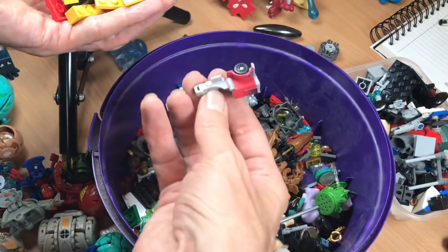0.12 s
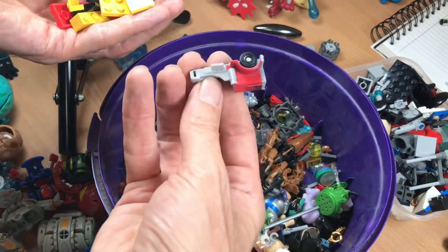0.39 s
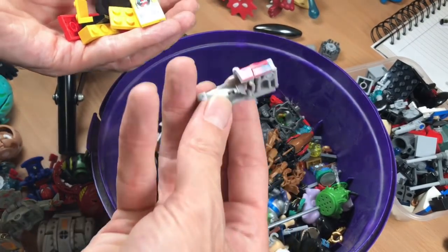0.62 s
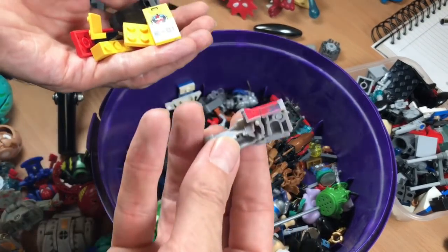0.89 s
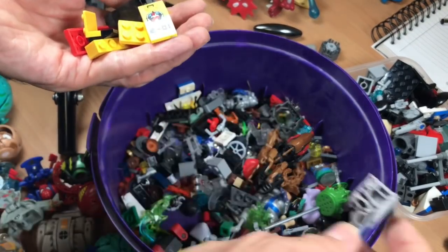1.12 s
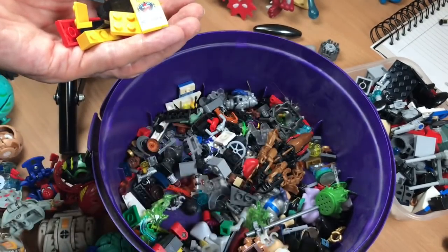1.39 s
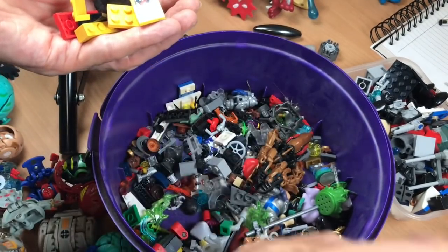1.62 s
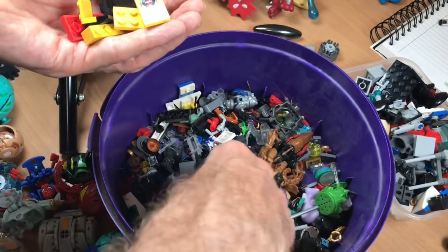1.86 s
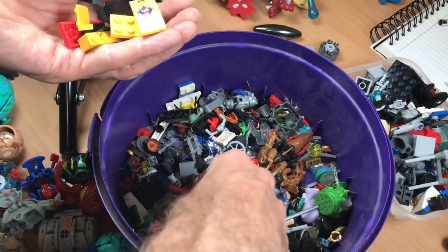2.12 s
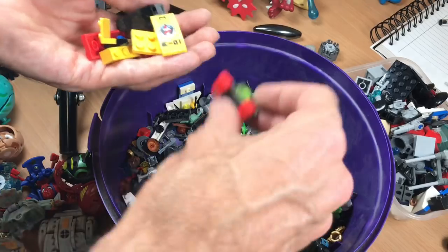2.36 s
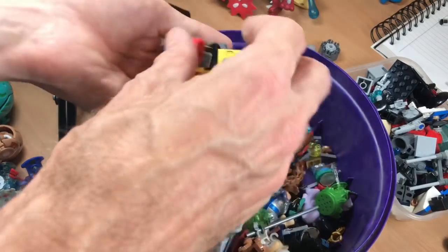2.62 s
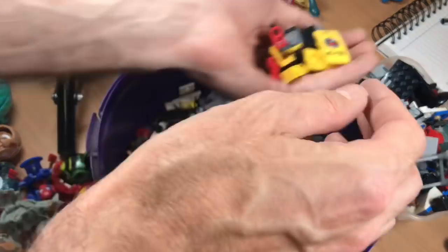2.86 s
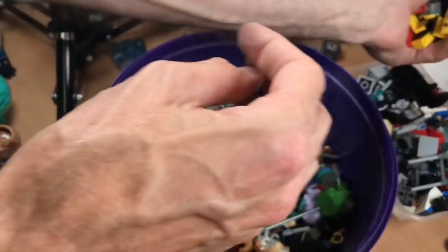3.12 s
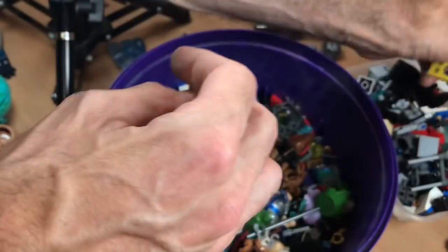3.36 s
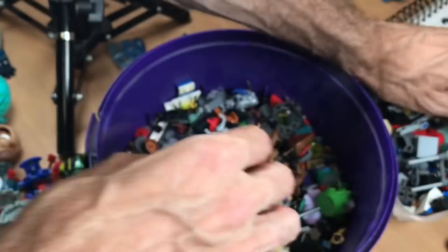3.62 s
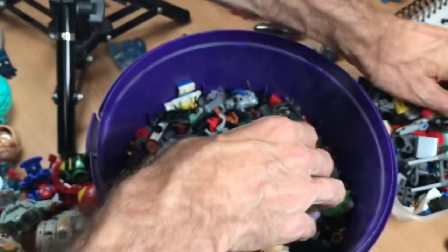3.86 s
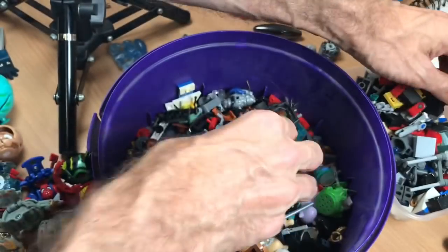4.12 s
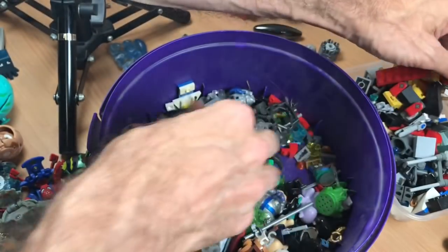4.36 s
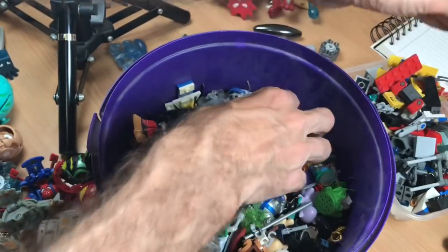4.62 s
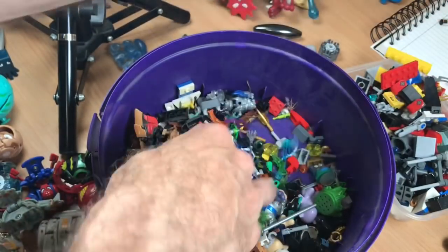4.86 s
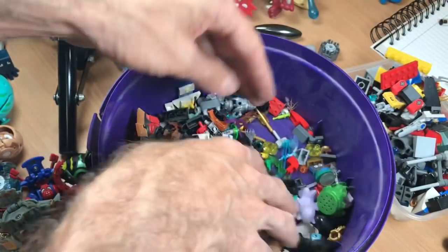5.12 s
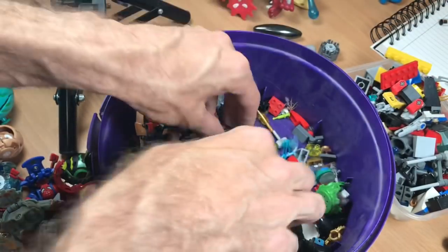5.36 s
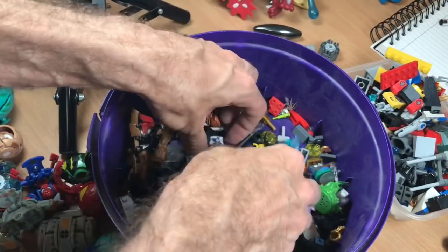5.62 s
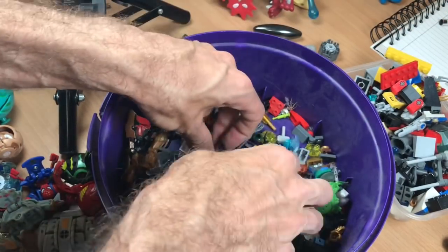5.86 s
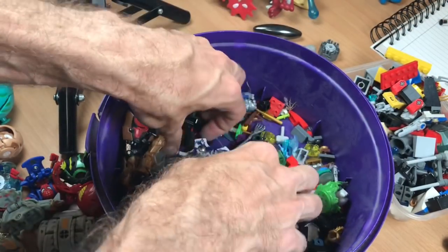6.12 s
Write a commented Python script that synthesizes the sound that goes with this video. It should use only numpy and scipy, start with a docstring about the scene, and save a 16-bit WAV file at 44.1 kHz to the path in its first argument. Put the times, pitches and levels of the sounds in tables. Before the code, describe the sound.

Near silence at first, with only soft skin rubs over hiss and hum. Light plastic pieces clack down, followed by sparse ticks and one sharp bright snap. Then rummaging begins: small toy bricks rattle and tumble densely in a plastic tub, loudest midway, while the tub and table boom softly. Close microphone, small room, short reverberation.

```python
"""In a quiet room, hands drop, pick up and stir small hollow plastic pieces in a plastic tub on a table.
Each collision, close to the microphone, is a sharp blow and a short chatter that ring the pieces' modes.
Many small collisions make the moving pile; pushes boom in the tub and table, and stirring shakes them.
Fingers rub softly as shaped noise. Behind it all are microphone hiss and a faint, wavering mains hum."""
import sys
import numpy as np
from scipy import signal
from scipy.fft import rfft, irfft, next_fast_len
from scipy.io import wavfile
from scipy.ndimage import uniform_filter1d, map_coordinates

SR = 44100
rng = np.random.default_rng(int(sys.argv[2]) if len(sys.argv) > 2 else 0)


def natural_amplitude(level_db):
    """Convert a level in decibels to a linear amplitude factor, elementwise."""
    exponent = np.asarray(level_db, float) / 20
    return 10 ** exponent


def int16_out(signal):
    """Quantize to a 16-bit WAV file."""
    q = np.round(np.clip(np.atleast_2d(signal).T, -1, 1) * 32767)
    wavfile.write(sys.argv[1], SR, q.astype(np.int16))


N = 275184  # length in samples

# collisions that stand out: (time [s], peak level [dB], strongest mode [Hz],
# low body against the peak [dB], chatter against the peak [dB])
COLLISIONS = [(1.046, -59, 5960, -25, -15), (1.4801, -22, 1850, -8.5, -14), (1.4864, -24, 11800, 0, -19),
              (1.5008, -27.5, 1460, -6, -10), (1.5372, -35.5, 1835, -10, -8.5),
              (1.5618, -24, 9800, -15.5, -12.5), (1.5945, -32, 5600, -9.5, -12),
              (1.8942, -45.5, 1660, 10, -9.5), (1.93, -31.5, 4700, -8, -12),
              (1.9614, -27.5, 2320, -15.5, -13), (1.99, -41, 2300, 1, -14), (2.0174, -55, 2170, -6, -10),
              (2.0518, -42.5, 7450, -15, -13.5), (2.0734, -37, 4600, -15, -14.5),
              (2.1646, -53.5, 1420, -34, -15), (2.3245, -32, 7000, -36, -19),
              (2.3446, -51, 7290, -34, -11.5), (2.451, -63, 5060, -16.5, -7.5),
              (2.5007, -48, 1730, 2.5, -14.5), (2.5227, -61, 1880, -13, -9),
              (2.5383, -27.5, 6100, -28.5, -14), (2.5432, -11, 7820, -38, -14),
              (2.5525, -34, 7700, -24.5, -8), (2.5904, -41.5, 7560, -42, -16),
              (2.608, -30, 7750, -34, -7.5), (2.6136, -20, 7500, -43, -17),
              (2.6404, -31.5, 8770, -29.5, -6), (2.6553, -30, 12500, -27, -16),
              (2.6883, -42.5, 6950, -14, -11), (2.821, -61, 1220, 1, -7.5), (2.8674, -56.5, 5020, -14, -13),
              (3.018, -51.5, 3320, -8.5, -13.5), (3.24, -56.5, 5800, -12.5, -10.5),
              (3.2924, -42, 5100, -24, -15.5), (3.2992, -45, 4800, -21, -8.5),
              (3.3687, -45, 5670, -14, -13.5), (3.4016, -55, 1970, 3, -12),
              (3.4373, -32.5, 2190, -39, -8.5), (3.4459, -18, 8690, -24, -15.5),
              (3.4917, -24.5, 6280, -22, -14), (3.5627, -34, 10700, -24, -15),
              (3.5772, -21, 7770, -23, -17.5), (3.6402, -31, 1660, 3, -16.5),
              (3.6594, -36, 5380, -30, -10.5), (3.6728, -35, 7960, -19, -15),
              (3.7211, -27, 6660, -14, -8.5), (3.7495, -23.5, 5240, -14.5, -14.5),
              (3.7938, -31.5, 6140, -23, -19), (3.8223, -27, 9330, -12, -13), (3.8432, -23, 8300, -13, -14),
              (3.8935, -26, 2120, -9, -13.5), (3.9044, -26.5, 1740, -13, -11),
              (3.976, -22.5, 2360, -8, -15), (4.0014, -24, 7930, -15, -17.5),
              (4.0504, -34.5, 7520, -15, -11), (4.106, -37.5, 1730, -3, -9.5),
              (4.132, -27.5, 8370, -14.5, -16), (4.148, -30.5, 7260, -31, -13.5),
              (4.172, -27.5, 6970, -10.5, -19.5), (4.2034, -48, 2120, -5, -13),
              (4.3074, -21, 1380, -11.5, -9), (4.3155, -15, 3820, -11, -15), (4.3309, -14, 3070, -9.5, -16),
              (4.3381, -12, 1620, -14, -14.5), (4.3734, -21, 1660, -14, -18),
              (4.3971, -22, 1640, -10.5, -8.5), (4.4507, -19.5, 7400, -26.5, -10.5),
              (4.4659, -18, 6260, -28, -13.5), (4.4826, -12, 6740, -4, -19.5),
              (4.491, -7.5, 2460, -17, -16.5), (4.5285, -12, 3700, -8, -20.5),
              (4.5367, -11.5, 3830, -10, -17.5), (4.5535, -12.5, 1506, -16.5, -15),
              (4.602, -23, 4600, -23.5, -11.5), (4.6306, -28.5, 1690, -15, -16),
              (4.6664, -17.5, 9520, -21, -14), (4.7054, -22, 6580, -25, -9.5),
              (4.7303, -20, 7500, -16, -11), (4.7678, -14, 9920, -20, -15),
              (4.8068, -17.5, 6700, -18.5, -15), (4.8334, -11.5, 9100, -37, -16),
              (4.8444, -16, 9050, -7.5, -20), (4.9326, -34, 6800, -9, -12.5), (5.02, -48, 2550, -6, -19),
              (5.0549, -40, 1540, -9, -2.5), (5.0674, -20, 7240, -6, -11.5),
              (5.0738, -21, 3770, -10.5, -12), (5.1102, -32.5, 1440, -4.5, -13.5),
              (5.1342, -24.5, 6740, -22, -14.5), (5.1462, -22, 1570, -15, -12.5),
              (5.1803, -21.5, 6910, 7, -13.5), (5.2146, -24.5, 7500, -20, -16),
              (5.2605, -31.5, 8200, -21, -14.5), (5.284, -29.5, 1610, 1, -8.5),
              (5.3729, -32.5, 1670, 1, -11), (5.4169, -25.5, 1600, -12, -9),
              (5.4366, -24.5, 2300, -6, -8.5), (5.5064, -34, 7550, -19, -14.5),
              (5.5319, -24.5, 3640, -14.5, -11.5), (5.5576, -24, 3120, -23, -15),
              (5.6027, -23.5, 4020, -31, -14), (5.6659, -25, 11100, -20, -10.5),
              (5.7108, -28, 8700, -17, -12), (5.7548, -19.5, 7000, -14, -14.5),
              (5.8022, -29.5, 1220, -5, -10.5), (5.816, -36, 4060, -14, -7.5),
              (5.8493, -35.5, 1570, 4, -15), (5.891, -43, 7400, -14, -1), (5.9184, -32, 4700, -15, -10),
              (5.9404, -22, 7200, -9, -11.5), (5.9644, -18, 2130, -13, -16.5),
              (6.0282, -17, 3830, -10, -15), (6.0565, -19.5, 4240, -11, -9.5),
              (6.0751, -22, 2460, -13.5, -14), (6.1614, -18, 7230, -6.5, -12.5),
              (6.193, -23, 6500, -8, -12.5)]


def clacks():
    """The collisions that stand out, each with its own strongest mode, body and chatter."""
    s, db, main_hz, body_db, chatter_db = np.transpose(COLLISIONS)
    usual_body_db = -11.5  # low body of a piece of middling size
    return collide(s, db, main_hz, body_db - usual_body_db, treble_share(main_hz), chatter_db,
                   size=4096, count=30, q=5.4, scatter_db=4.0,
                   main_db=5.5, width_hz=200, t60=0.056, spiky_db=3)


def treble_share(main_hz):
    """Treble of a piece in dB: smaller pieces ring higher and carry more of it."""
    at_5_khz_db, per_octave_db = 3, 11
    return at_5_khz_db + per_octave_db * np.log2(main_hz / 5000)


# how strongly the plastic pieces ring at each pitch: (frequency [Hz], level [dB])
PIECE_COLOUR = [(180, -37), (300, -18.5), (478, -12), (574, -10.5), (915, -5.5), (1610, 1.5), (5700, -0.5),
                (7440, 3), (12500, -17.5), (16000, -72)]


def collide(s, db, main_hz, body_db, top_db, chatter_db,
            size, count, q, scatter_db, main_db, width_hz, t60, spiky_db):
    """A sharp blow and a dying chatter of contacts ring one strong mode and `count` random ones."""
    t, hz = np.arange(size) / SR, np.fft.rfftfreq(size, 1 / SR)

    def resonance(centre, width, gain):
        """One ringing mode; a wider one dies faster."""
        return gain * 1j * hz * width / (centre * centre - hz * hz + 1j * hz * width)

    # modes crowd towards the treble
    spread = (np.arange(count) + rng.random((len(s), count))) / count
    modes = 400 * (16000 / 400) ** (spread ** 0.772)
    colour = along(PIECE_COLOUR, modes) + rng.normal(0, scatter_db, modes.shape)
    colour += body_db[:, None] / (1 + (modes / 4300) ** 5)
    colour += top_db[:, None] / (1 + (9500 / modes) ** 8)
    shape = 0
    for k in range(count):
        mode = modes[:, [k]]
        shape = shape + (-1) ** k * resonance(mode, mode / q, natural_amplitude(colour[:, [k]]))
    # small bright pieces ring the clearest
    strong_db = main_db + colour.max(1) - 6 / (1 + (main_hz / 3500) ** 4)
    shape = shape + resonance(main_hz[:, None], width_hz, natural_amplitude(strong_db)[:, None])

    # the blow is a burst of noise that dies within 2 ms
    touch = rng.standard_normal((len(s), size)) * natural_amplitude(-60 * t / 0.002)
    blow = irfft(rfft(touch) * shape, size)
    blow /= np.abs(blow).max(1)[:, None]

    # the chatter swells quickly, then dies; its strength jumps every 32 samples
    fade = natural_amplitude(-60 * t / t60) * (1 - np.exp(-t / 0.0013)) * (t < size / SR * 0.8)
    uneven = natural_amplitude(spiky_db * rng.standard_normal((len(s), size // 32)).repeat(32, 1))
    contacts = rng.standard_normal((len(s), size)) * uneven * fade
    chatter = irfft(rfft(contacts) * shape, size)
    chatter /= chatter[:, :400].std(1)[:, None]

    sound = natural_amplitude(db)[:, None] * (blow + natural_amplitude(chatter_db)[:, None] * chatter)
    at = np.round(s * SR).astype(int)[:, None] + np.arange(size)
    return np.bincount(at.ravel(), sound.ravel(), N + size)[:N]


def pile():
    """Hundreds of small random collisions a second while the pile shifts."""
    per_second = 480
    s = np.sort(rng.random(int(per_second * N / SR))) * (N - 1) / SR
    db, body_db = motion(s)
    moving = db > -100
    s, db, body_db = s[moving], db[moving], body_db[moving]
    pitch, loudness, roughness = rng.standard_normal((3, len(s)))
    main_hz = np.clip(4500 * np.exp(0.503 * pitch), 900, 13000)
    top_db = np.full(len(s), -1.5)
    return collide(s, db + 2.5 + 2.2 * loudness, main_hz, body_db, top_db, -15.5 + 3 * roughness,
                   size=1024, count=12, q=2.77, scatter_db=2.0,
                   main_db=-9.5, width_hz=700, t60=0.073, spiky_db=-0.5)


# strokes of the stirring hand, one list each: (time [s], level [dB])
STIRRING = [
    [(3.4, -79), (3.46, -39.5), (3.61, -49), (3.7, -49), (3.76, -41.5), (3.84, -45), (3.92, -37),
     (4.01, -43), (4.08, -55), (4.16, -53.5), (4.29, -80)],
    [(4.306, -40), (4.36, -38), (4.44, -46.5), (4.455, -39), (4.55, -28), (4.64, -35), (4.7, -35),
     (4.77, -35), (4.85, -39), (4.908, -47.5), (5.04, -83)],
    [(5.054, -37), (5.14, -34.5), (5.25, -43), (5.29, -39.5), (5.38, -42.5), (5.44, -35), (5.5, -42),
     (5.6, -37.5), (5.75, -36), (5.79, -42.5), (5.82, -41.5), (5.87, -49.5)],
    [(5.87, -49), (5.95, -32.5), (6.01, -31), (6.07, -35), (6.14, -40), (6.17, -36), (6.24, -46.5)],
]
# a piece or a hand lands on the pile, which then settles:
# (time [s], level [dB], settling [dB per s], low body [dB])
LANDINGS = [(1.48, -46, 130, 14), (1.925, -46, 120, 6.5), (2.54, -40, 150, -26)]


def motion(s):
    """Level and low body (dB) of the moving pile at times s: stirred, or settling after a landing."""
    silent_db = -140
    times, levels = np.concatenate(STIRRING).T
    stirred = np.any([(s >= stroke[0][0]) & (s <= stroke[-1][0]) for stroke in STIRRING], axis=0)
    db = np.where(stirred, np.interp(s, times, levels), silent_db)
    body_db = np.full(len(s), 3.5)
    for start, level_db, settle_db, low_db in LANDINGS:
        settling = np.where(s >= start, level_db - settle_db * (s - start), silent_db)
        body_db = np.where(settling > db, low_db, body_db)
        db = np.maximum(db, settling)
    return db, body_db


# pushes on the tub: (time [s], level [dB], lean towards the highest mode [dB], knock against the push [dB])
PUSHES = [(1.495, -41.5, -5.5, 3.5), (1.919, -31.5, -5.5, -13.5), (2.498, -62.5, -3, 13.5),
          (2.813, -50, -4, -9), (3.46, -50, -8, -4), (3.535, -45, -5.5, 5), (3.638, -58, 4, 15.5),
          (3.88, -43.5, -3.5, 1.5), (3.942, -50.5, 4, -20), (4.307, -33.5, 3.5, 5), (4.49, -47.5, 11, 8),
          (4.544, -38, -4, 3), (4.653, -46.5, 5.5, -25), (4.691, -52, 8, -20), (5.065, -33.5, -6.5, -4),
          (5.281, -42, 0.5, 2.5), (5.436, -32, -2, -9), (5.635, -42, 3, -7), (5.962, -49.5, 8, 8),
          (6.055, -45, 5.5, -4), (6.19, -48.5, 6, 12.5)]
# low modes of the tub on its table: (frequency [Hz], level [dB], time to fall 60 dB [s])
TUB_MODES = [(56.8, -8.5, 0.29), (93.3, -3.5, 0.45), (143.1, -1.5, 0.28)]
# colour of the knock on the tub wall: (frequency [Hz], level [dB])
KNOCK_COLOUR = [(150, -24), (230, -2.5), (400, -9), (650, -3.5), (1200, -26.5)]
# colour of the shaken tub: (frequency [Hz], level [dB])
SHAKE_COLOUR = [(12, -21), (20, 14.5), (49, -4.5), (93, 1.5), (201, -11), (358, -9), (468, -17.5),
                (594, -9.5), (700, -21.5), (910, -17), (1540, -120)]


def tub():
    """Pushes ring the low modes of tub and table and knock its wall; a moving pile shakes them."""
    booms, knocks = np.zeros(N + SR), np.zeros(N + SR)
    t = np.arange(SR // 2) / SR
    for s, db, lean_db, knock_db in PUSHES:
        ring = 0
        for (hz, level, t60), share in zip(TUB_MODES, [-lean_db, 0, lean_db]):
            phase = rng.normal(0, 1.0)
            ring = ring + natural_amplitude(level + share - 60 * t / t60) * np.sin(2 * np.pi * hz * t + phase)
        swell = 1 - np.exp(-t / 0.0072)
        start = round(s * SR)
        booms[start:][:len(t)] += natural_amplitude(db + 2.5) * ring * swell
        knocks[start:][:len(t)] += natural_amplitude(db + knock_db - 4.5 - 60 * t / 0.11)

    # a louder or fuller pile shakes the tub more; a still one hardly at all
    pile_db, body_db = motion(np.arange(N) / SR)
    shake_db = -52 + 0.59 * (pile_db + 42 + 0.96 * body_db) - 60 * (pile_db < -100)
    strength = uniform_filter1d(natural_amplitude(shake_db + 2.0 * wobble(23)), 500)
    return booms[:N] + knocks[:N] * noise(KNOCK_COLOUR) + strength * noise(SHAKE_COLOUR)


# fingers sliding over a piece: (middle [s], half length [s], level before doubling [dB],
# share of dry hiss [0-1])
SLIDES = [(0.518, 0.072, -69.5, 0.22), (1.2, 0.11, -71, 0.57), (1.285, .05, -73.5, 0.77),
          (1.386, 0.19, -79, .6), (2.196, 0.032, -71.5, 0)]
# colour of skin on plastic: (frequency [Hz], level [dB])
SKIN_COLOUR = [(300, -22), (600, -1.5), (2500, -8.5), (7000, -3), (10000, -9)]


def fingers():
    """Skin slides softly over plastic: a dull rub below 2.5 kHz, a dry hiss above."""
    t, skin = np.arange(N) / SR, noise(SKIN_COLOUR)
    hiss = filtered(skin, lambda hz: 1 / (1 + (2500 / (hz + 1)) ** 4))
    rub = skin - hiss
    sound = np.zeros(N)
    for middle, half, db, dryness in SLIDES:
        stroke = natural_amplitude(db) * np.exp(-2 * ((t - middle) / half) ** 2)
        dryness = np.clip(dryness, 0, 1)
        sound += 2 * stroke * (dryness * hiss + (1 - dryness) * rub)
    return uniform_filter1d(natural_amplitude(1.2 * wobble(40.6)), 900) * sound


# how long tub walls and room answer: (frequency [Hz], time to fall 60 dB [s])
ROOM_DECAY = [(300, 0.34), (2000, 0.2), (6000, 0.14), (14000, 0.15)]


def room(x):
    """Diffuse answer of tub walls and room, drawn anew every quarter second; the bass lasts longest."""
    out, step = np.zeros(N + SR), SR // 4
    delay = 130  # samples, about 3 ms
    for start in range(0, N, step):
        hz, t, z = signal.stft(rng.standard_normal(SR // 3), SR, nperseg=256)
        decay = natural_amplitude(-60 * t / along(ROOM_DECAY, hz)[:, None])
        tail = signal.istft(z * decay, SR, nperseg=256)[1]
        wet = signal.fftconvolve(x[start:start + step], tail / np.linalg.norm(tail))
        out[start + delay:][:len(wet)] += wet
    return out[:N]


# colour of the microphone hiss: (frequency [Hz], level [dB])
HISS_COLOUR = [(15, 2.5), (30, -10.5), (90, -10.5), (160, -14), (300, -21.5), (700, -28.5), (1100, -31),
               (5000, -33.5), (13800, -30.5), (16500, -36.5)]
# mains hum: (frequency [Hz], usual rms level [dB])
HUM_TONES = [(100, -73), (200, -80.5)]


def background():
    """Steady coloured noise for microphone hiss, and mains tones wavering in level and phase."""
    t = np.arange(N) / SR
    hum = np.zeros(N)
    for hz, db in HUM_TONES:
        level = np.sqrt(2) * natural_amplitude(db + 2.2 * wobble(5.9))
        hum += level * np.sin(2 * np.pi * hz * t + 0.6 * wobble(1.3))
    hiss_db = -66  # rms
    return natural_amplitude(hiss_db) * noise(HISS_COLOUR) + hum


def unit(x):
    """Scaled to rms 1."""
    return x / np.sqrt(np.mean(x ** 2) + 1e-20)


def along(points, hz):
    """(Hz, value) points read on a log frequency axis."""
    f, v = np.transpose(points)
    return np.interp(np.log(hz + 1), np.log(f + 1), v)


def wobble(rate):
    """A smooth random curve through `rate` random points a second."""
    return map_coordinates(rng.standard_normal(int(N * rate / SR) + 4), [np.arange(N) * rate / SR])


def filtered(x, response):
    """x with each frequency multiplied by response(hz)."""
    m = next_fast_len(N + 8192)  # spare room for the filter's ringing
    return irfft(rfft(x, m) * response(np.fft.rfftfreq(m, 1 / SR)), m)[..., :N]


def noise(colour):
    """Random noise of rms 1 with the given colour."""
    return unit(filtered(rng.standard_normal(N), lambda hz: natural_amplitude(along(colour, hz))))


def scene():
    """Everything heard at the microphone; only the pieces get the room's answer."""
    pieces = clacks() + pile()
    mix = pieces + natural_amplitude(-7.5) * room(pieces) + tub() + fingers() + background()
    return mix[None]


def low_pass(x):
    """Removes everything above the highest recorded frequency."""
    return signal.sosfilt(signal.butter(12, 16820, fs=SR, output="sos"), x)


def record(dry):
    """The microphone weakens the deepest bass, below about 24 Hz; nothing passes from 15.9 kHz up."""
    def microphone(hz):
        return (hz < 15900) * 1j * hz / (24 + 1j * hz)

    mix = filtered(dry, microphone)
    return low_pass(mix)


dry = scene()
out = record(dry)
int16_out(out)
```